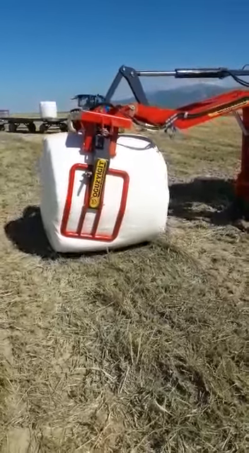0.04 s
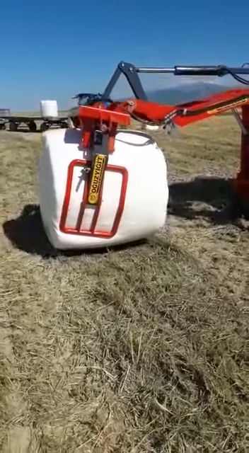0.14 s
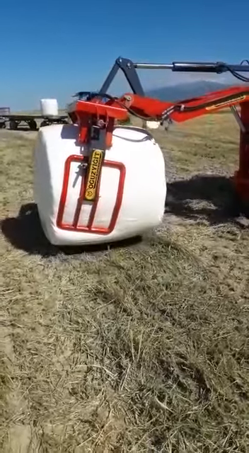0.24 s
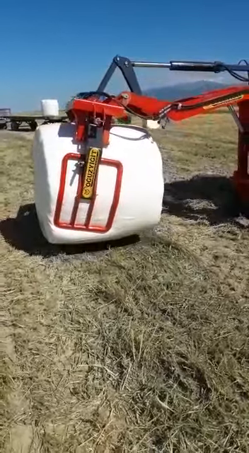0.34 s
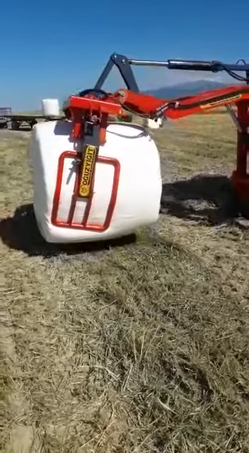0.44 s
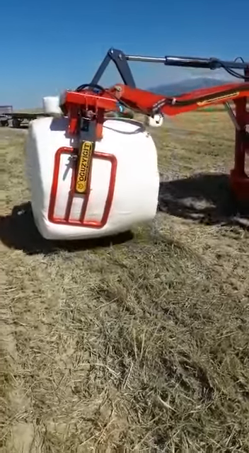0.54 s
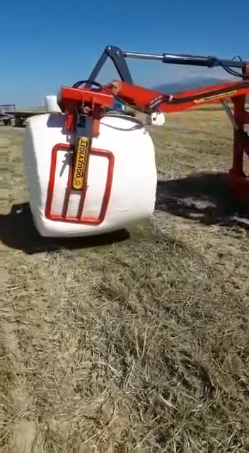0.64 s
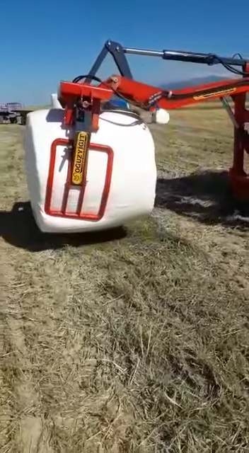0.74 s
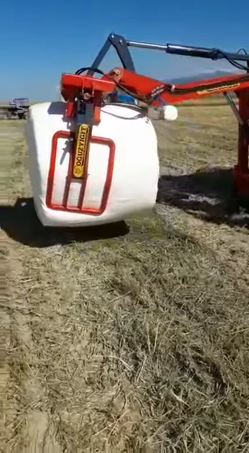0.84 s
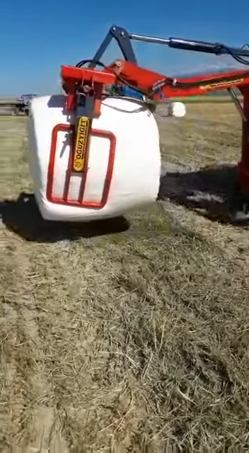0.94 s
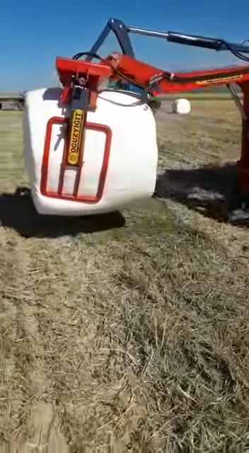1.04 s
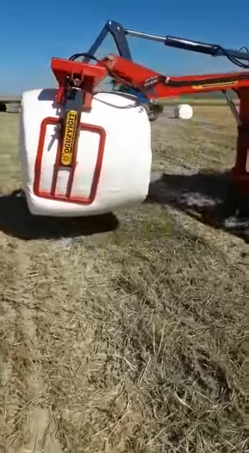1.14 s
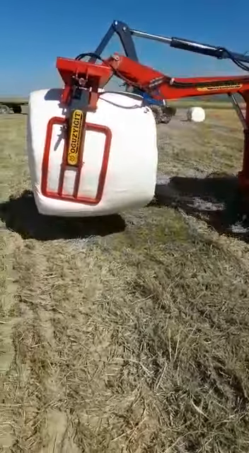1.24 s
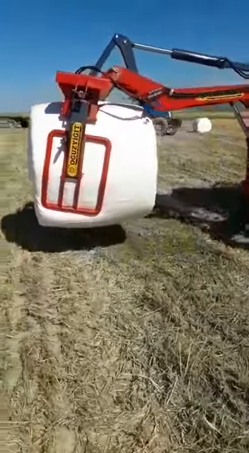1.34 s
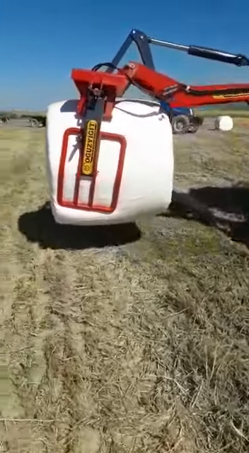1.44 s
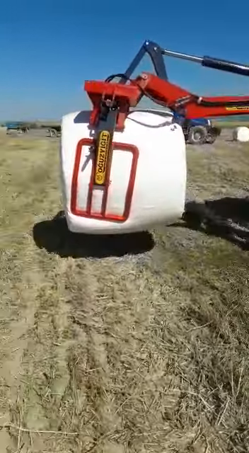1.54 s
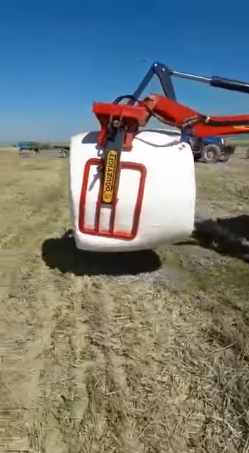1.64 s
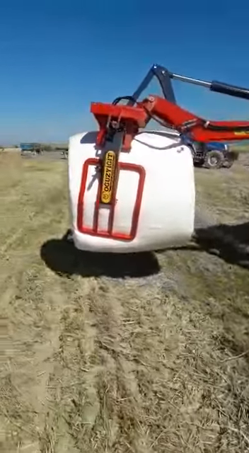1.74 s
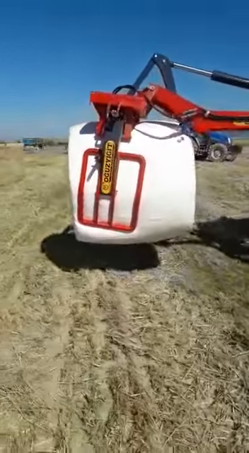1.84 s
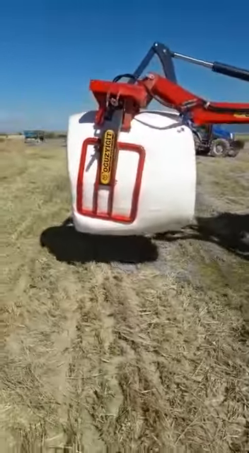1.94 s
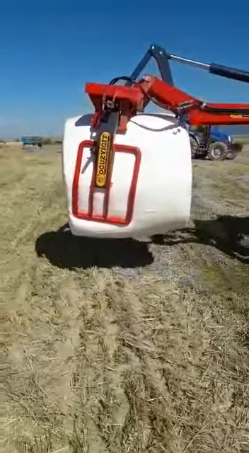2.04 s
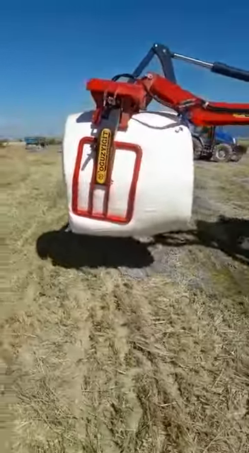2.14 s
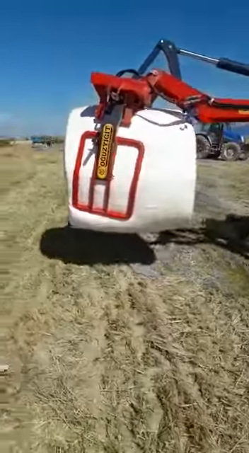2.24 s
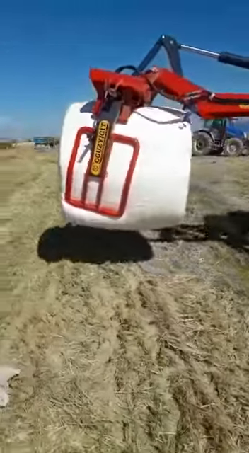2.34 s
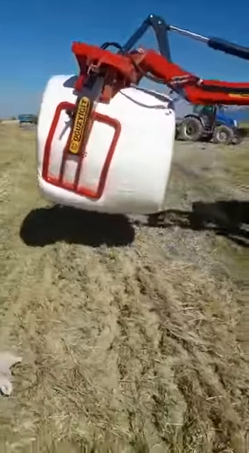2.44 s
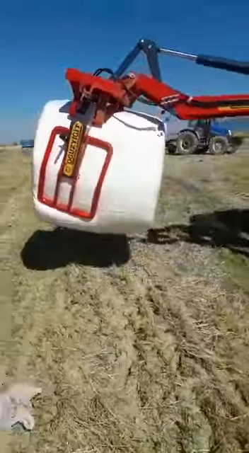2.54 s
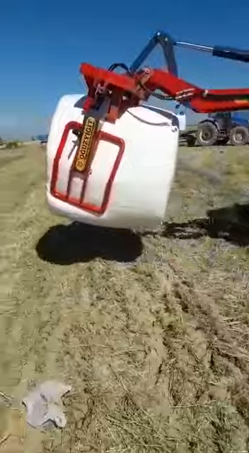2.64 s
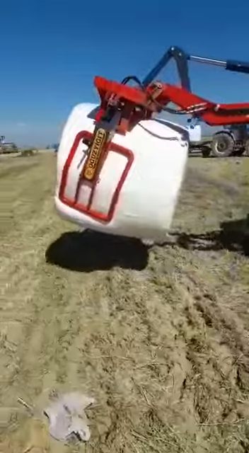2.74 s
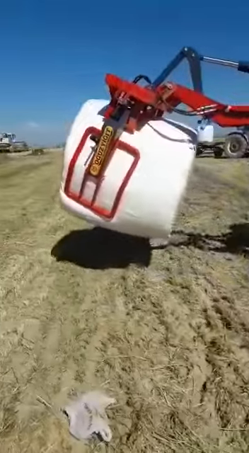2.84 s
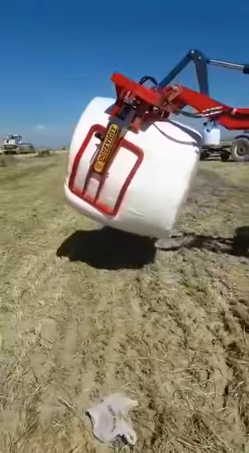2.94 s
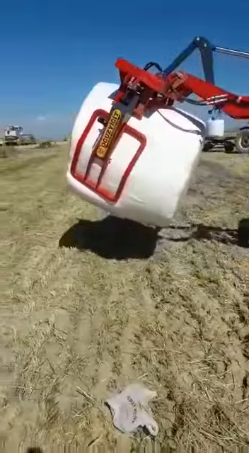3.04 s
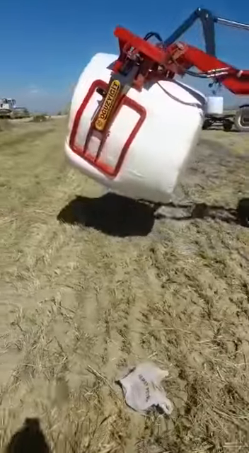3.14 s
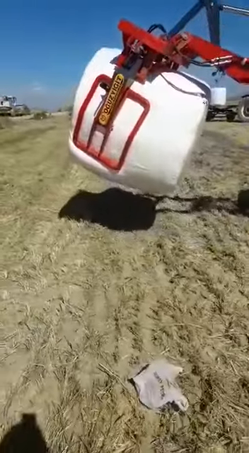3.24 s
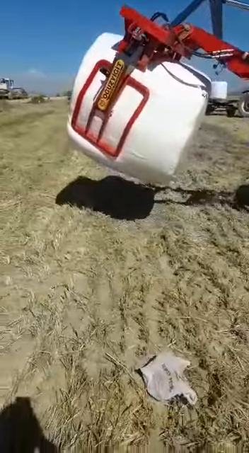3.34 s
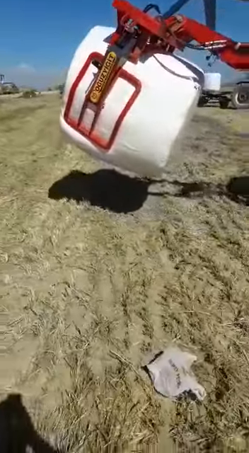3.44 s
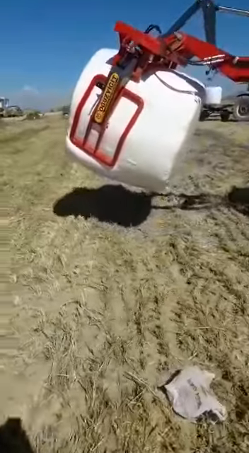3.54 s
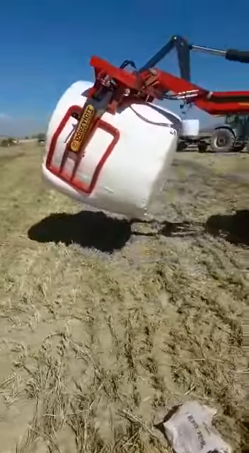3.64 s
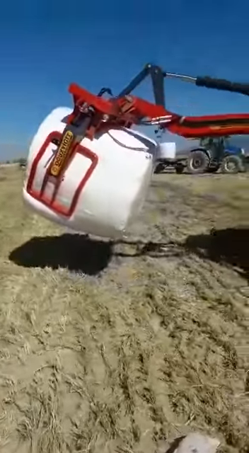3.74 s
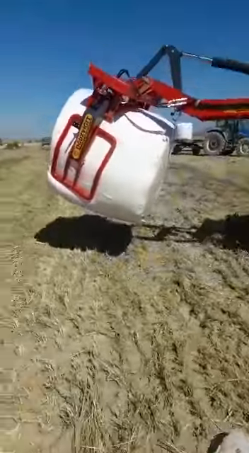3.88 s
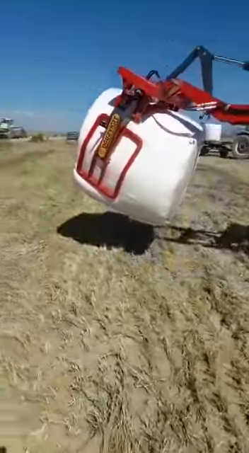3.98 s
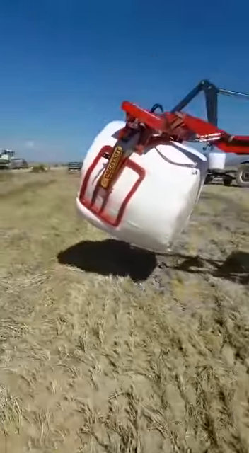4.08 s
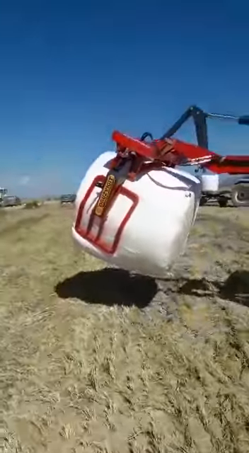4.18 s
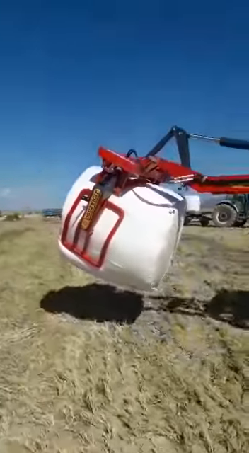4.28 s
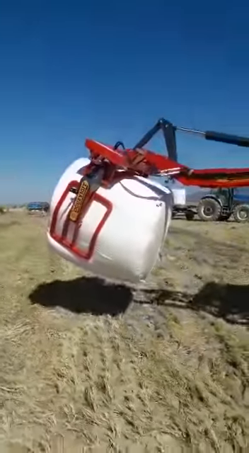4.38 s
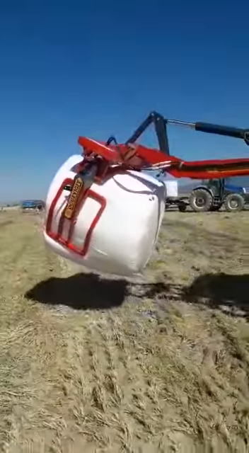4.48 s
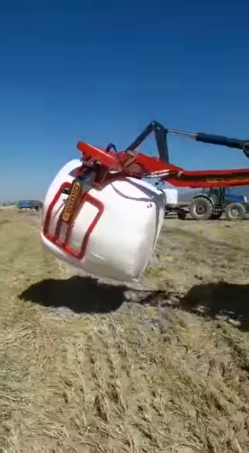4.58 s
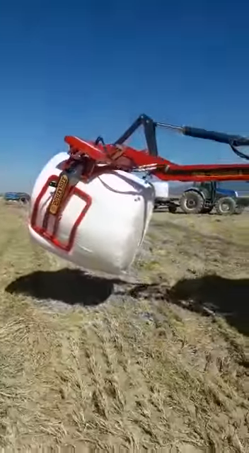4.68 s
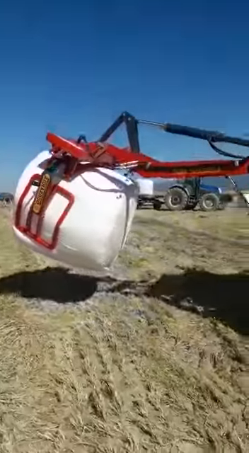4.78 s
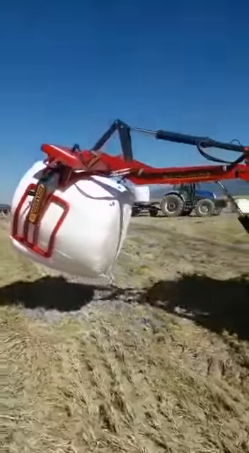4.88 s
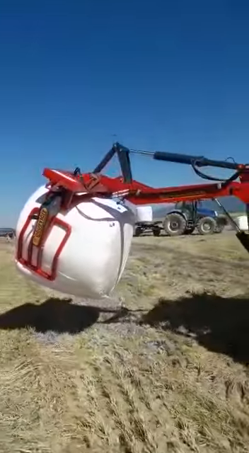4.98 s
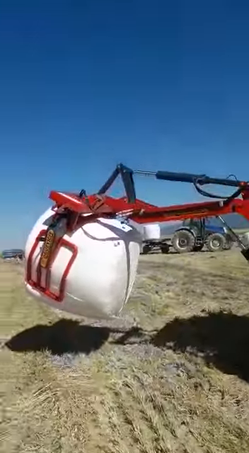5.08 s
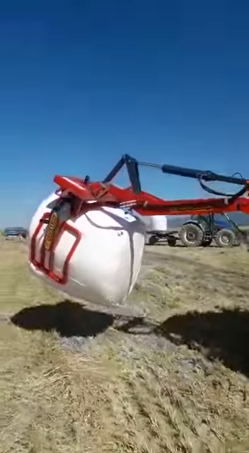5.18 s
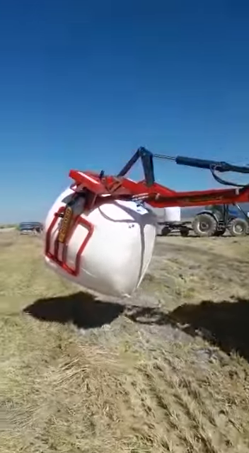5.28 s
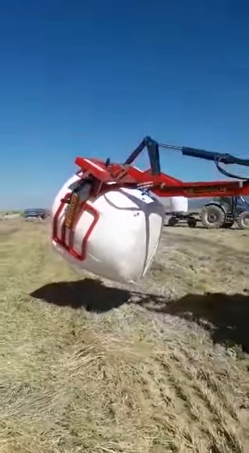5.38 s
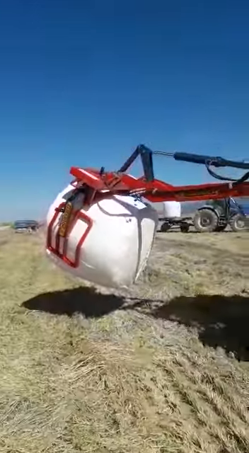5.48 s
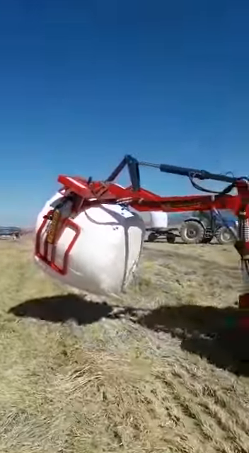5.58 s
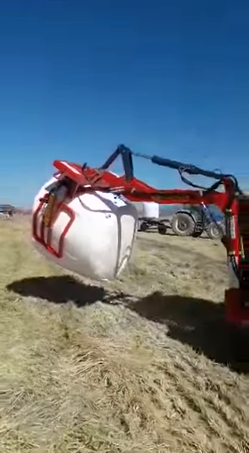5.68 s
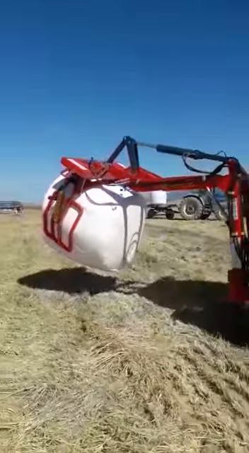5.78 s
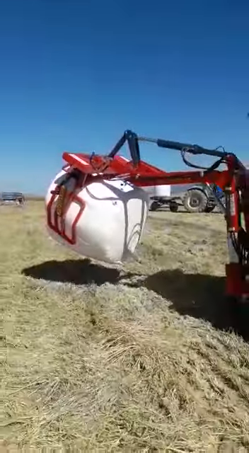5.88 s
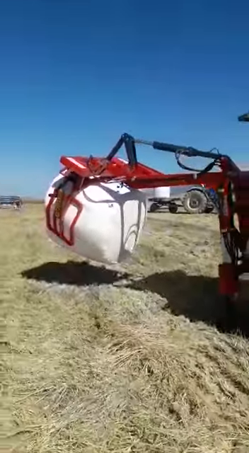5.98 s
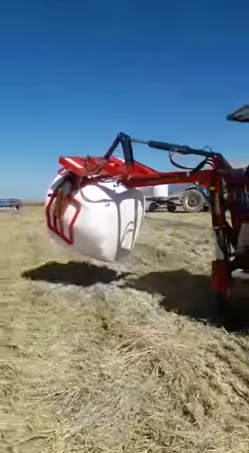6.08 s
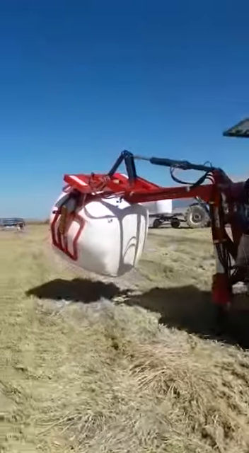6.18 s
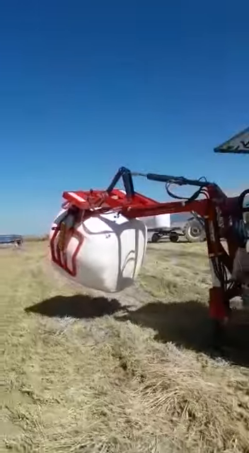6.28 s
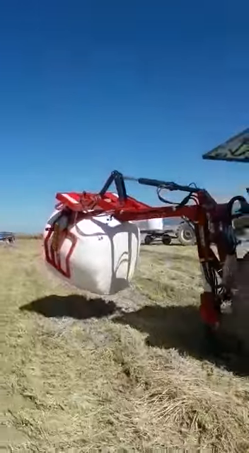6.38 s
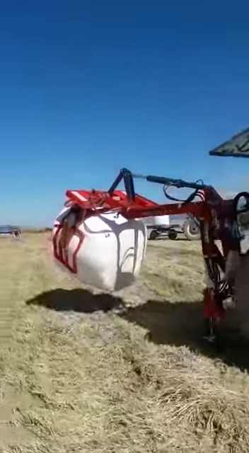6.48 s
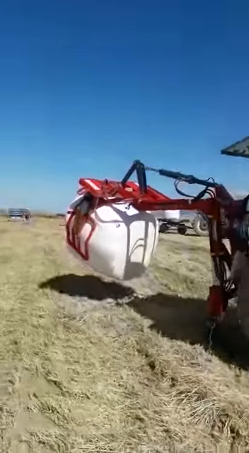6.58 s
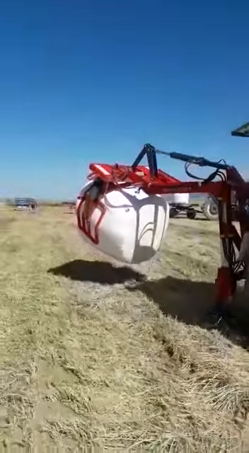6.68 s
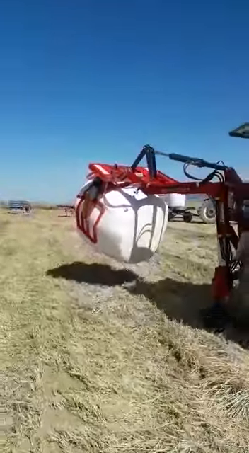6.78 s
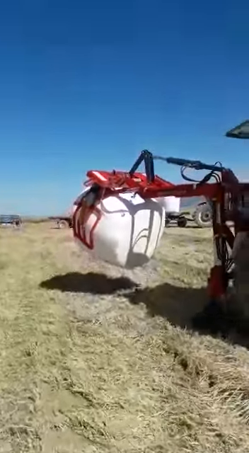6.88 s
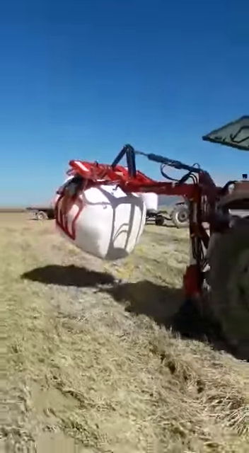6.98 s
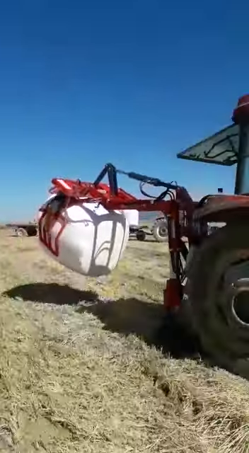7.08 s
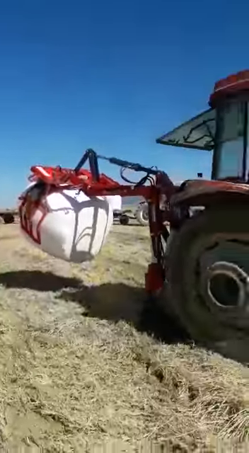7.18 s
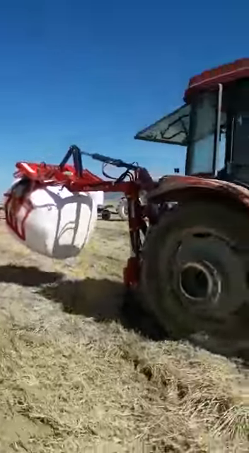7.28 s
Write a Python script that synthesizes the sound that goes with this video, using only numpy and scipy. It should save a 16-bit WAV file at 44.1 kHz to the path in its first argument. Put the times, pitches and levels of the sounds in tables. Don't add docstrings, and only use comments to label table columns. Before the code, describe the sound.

A tractor's muffled diesel idle turns into loud, rattling clatter with hydraulic squeals and metal knocks, then revs up as it passes close by.

```python
import sys
import numpy as np
from scipy import signal
from scipy.fft import rfft, irfft, next_fast_len
from scipy.io import wavfile
from scipy.ndimage import uniform_filter1d

SR = 44100
rng = np.random.default_rng(int(sys.argv[2]) if len(sys.argv) > 2 else 0)


def boost(x):
    u = np.asarray(x, float) / 20
    return 10 ** u


def to_wav(s):
    ch = np.atleast_2d(s).T
    pcm = np.round(np.clip(ch, -1, 1) * 32767)
    wavfile.write(sys.argv[1], SR, pcm.astype(np.int16))


N = 322812
IDLE_PER_S = 31
MID_DB = -35
ECHO_FADE_S = 0.091

# start_s, level_db
NEAR = [(0, -57), (.77, -54), (1.28, -52.5), (1.75, -54.5), (2.32, -49.5), (2.42, -37.5), (2.88, -32.5),
        (3.22, -37.5), (3.55, -34), (4.06, -37), (4.33, -32), (4.4, -43), (5.01, -37.5), (5.12, -30),
        (5.89, -28), (6.3, -21.5), (6.7, -22), (7.32, -23)]
# start_s, open_path (0-1)
IN_VIEW = [(0, 0), (2.3, 0.12), (2.42, 0.77), (4.35, 0.96), (4.4, 0.08), (5, 0.96), (5.1, 1), (7.32, 0.99)]
# idle_db, share of nearness, behind_bale_db, revs_db per firing/s, share of a lurch
RUMBLE_LAW = (-25, 0.63, 1, 0.0678, 0.6)
# pitch_hz, level_db (per Hz)
CLATTER = [(880, -26.5), (1500, -0.5), (1710, -12.5), (2140, -6), (2740, -10), (3010, -16.5), (4270, -26),
           (6130, -40), (7730, -54.5), (8500, -53), (11000, -81.5), (18700, -120)]
# pitch_hz, level_db (per Hz)
STUBBLE = [(4410, -43.5), (7500, -18), (8000, -25), (9510, -12.5), (11200, -3.5), (13800, -1), (15300, 1.5),
           (16200, -9.5)]


def rms_one(x):
    return x / np.sqrt(np.mean(x ** 2) + 1e-20)


def in_time(rows):
    start_s, *columns = np.transpose(rows)
    return [np.interp(np.arange(N) / SR, start_s, column) for column in columns]


def at_hz(points, hz):
    points_hz, points_db = np.transpose(points)
    return np.interp(np.log(hz), np.log(points_hz), points_db)


def drift(rate_hz):
    pole = np.exp(-80 * np.pi * rate_hz / SR)
    noise = rng.standard_normal(N // 40 + 2002)
    slow = signal.lfilter([1], [1, -2 * pole, pole * pole], noise)[2000:]
    return np.interp(np.arange(N) / 40, np.arange(len(slow)), rms_one(slow))


def coloured(x, colour):
    size = next_fast_len(N)
    hz = np.arange(1, size // 2 + 2) * SR / size
    inside = (hz > colour[0][0]) & (hz < colour[-1][0])
    return rms_one(irfft(rfft(x, size) * boost(at_hz(colour, hz)) * inside, size)[:N])


def tone(hz, wobble_hz, flutter_db, rough):
    turns = np.cumsum(hz + wobble_hz * drift(9.49)) / SR + rng.random()
    spread = 1 + rough * (drift(36.0) + 1j * drift(23.0))
    wave = np.real(spread * np.exp(2j * np.pi * turns))
    return np.sqrt(2) * wave * boost(flutter_db * drift(3.8))


def spell(start_s, length_s, fade_s):
    t = np.arange(N) / SR
    to_edge = np.minimum(t - start_s, start_s + length_s - t)
    return np.clip(to_edge / max(fade_s, 1e-3) + 0.5, 0, 1)


def spells_db(spells, fade_s):
    return sum(db * spell(start_s, length_s, fade_s) for start_s, length_s, db in spells)


def peak(at_s, length_s):
    return np.clip(1 - np.abs(np.arange(N) / SR - at_s) / max(length_s, 1e-3), 0, 1)


def heard_db(law, speed):
    # at_s, length_s, level_db
    lurches = [(1.765, 0.047, 6), (2.498, 0.033, 5.5), (2.531, 0.033, -2.5), (2.601, 0.049, 4),
               (2.691, 0.02, -2.5), (2.77, 0.11, 2), (3.496, 0.026, -4), (3.345, 0.14, 5.5),
               (4.316, 0.054, 2), (5.265, 0.062, 5), (5.736, 0.13, 2.5), (6.341, 0.031, 5),
               (6.443, 0.039, 1.5), (7.06, 0.048, 2.5), (7.132, 0.081, -2.5), (7.191, 0.08, 3.5)]
    idle_db, near_share, shaded_db, revs_db, lurch_share = law
    near_db = near_share * (in_time(NEAR)[0] - MID_DB)
    shade = 1 - np.clip(in_time(IN_VIEW)[0], 0, 1)
    lurch_db = sum(db * peak(at_s, length_s) for at_s, length_s, db in lurches)
    return idle_db + near_db + shaded_db * shade + revs_db * (speed - IDLE_PER_S) + lurch_share * lurch_db


def microphone_hiss():
    # pitch_hz, level_db (per Hz)
    hiss_colour = [(1180, -19.5), (2000, -0.5), (2510, -9.5), (3920, -12), (7690, -26), (10000, -24.5),
                   (13000, -48.5), (22000, -120)]
    return boost(-66.5) * coloured(rng.standard_normal(N), hiss_colour)


def breeze(speed):
    # pitch_hz, level_db (per Hz)
    wind_colour = [(20, -18.5), (30, -6), (40, -3.5), (55, -6.5), (80, -14)]
    # start_s, length_s, level_db
    gusts = [
        (2.5, 1.1, -9),
        (3.853, 0.8, 7),
        (4.998, 1.1, 1.5),
        (6.297, 0.56, -14),
    ]
    level_db = uniform_filter1d(heard_db(RUMBLE_LAW, speed), size=SR) * 0.56 - 47.5
    level_db += spells_db(gusts, 0.15)
    return boost(level_db + 3.5 * drift(2.3)) * coloured(rng.standard_normal(N), wind_colour)


def thuds():
    # at_s, level_db, pitch_hz, t60_s (time to die by 60 dB)
    case_knocks = [(1.777, -17.5, 114.6, 0.065), (2.277, -22.5, 122, 0.068), (2.353, -21.5, 100, 0.071),
                   (4.238, -23, 120, .03), (4.308, -12.5, 140, 0.046), (4.31, -15, 70, 0.073),
                   (4.356, -14, 175, 0.041), (4.4, -16, 101, 0.028), (4.48, -17, 111, 0.022),
                   (4.541, -13, 95, 0.022), (4.635, -17.5, 170, 0.064), (4.821, -15.5, 220, 0.024),
                   (4.905, -17.5, 230, 0.036), (5.044, -13, 140, 0.07), (2.545, -20, 377, 0.024),
                   (2.794, -19.5, 402, 0.029), (5.595, -15, 480, .02), (5.672, -17, 400, 0.021),
                   (5.736, -14, 420, 0.022), (5.788, -15, 400, .02)]
    out = np.zeros(N)
    t = np.arange(int(0.2 * SR)) / SR
    swell = (1 - np.exp(-t / 0.005)) ** 2
    for at_s, db, hz, t60_s in case_knocks:
        ring = swell * boost(-60 * t / max(t60_s, 0.02)) * np.sin(2 * np.pi * hz * t)
        at = round(at_s * SR)
        out[at:at + len(t)] += boost(db - 3.0) * ring / np.abs(ring).max()
    return out


def stubble(speed):
    # at_s, length_s, level_db
    steps = [(2.45, 0.12, -66), (2.57, .12, -67), (2.97, 0.18, -66), (3.117, 0.14, -64), (3.34, 0.15, -61),
             (3.444, 0.035, -66), (4.32, 0.041, -58), (5.264, .2, -67), (5.51, .25, -65.5),
             (5.693, 0.14, -63), (6.345, 0.32, -59), (6.685, 0.16, -56), (7.222, 0.16, -61)]
    # at_s, peak_db
    snaps = [(2.387, -60), (2.441, -63), (2.484, -60), (2.561, -60), (3.345, -58), (3.351, -58),
             (3.371, -58), (3.395, -59), (3.4355, -45), (3.4385, -48), (3.455, -55), (3.516, -59),
             (3.683, -59), (4.0946, -59), (4.3117, -55), (5.991, -49), (6.0697, -52), (6.1002, -51),
             (6.2984, -47), (6.57, -41), (6.7725, -47), (6.8339, -57.5), (6.9365, -45), (7.1166, -44),
             (7.1611, -47), (7.1814, -47), (7.2065, -41), (7.2647, -52)]
    # idle_db, share of nearness, behind_bale_db, revs_db per firing/s, share of a lurch
    tyres_law = (-72, 0.5, 1.5, 0.13, -1)
    sizes = boost(1.2 * np.minimum(rng.exponential(1, N), 5)) * rng.standard_normal(N)
    cracks_per_s = 16000 * boost(1.3 * drift(40.0))
    cracks = sizes * (rng.random(N) < cracks_per_s / SR)
    field = boost(2 * -70.5)
    tyres = boost(2 * heard_db(tyres_law, speed))
    feet = sum(boost(2 * db) * peak(at_s, length_s) ** 2 for at_s, length_s, db in steps)
    out = boost(-1.5) * np.sqrt(field + tyres + feet) * coloured(cracks, STUBBLE)
    fade = np.exp(-np.arange(260) / 60.0)
    bright = signal.butter(4, [11500, 16000], "band", fs=SR, output="sos")
    for at_s, db in snaps:
        snap = signal.sosfilt(bright, rng.standard_normal(260) * fade)
        at = round(at_s * SR)
        out[at:at + 260] += boost(db) * snap / np.abs(snap).max()
    return out


def slams():
    # at_s, level_db, rise_s, t60_s
    joints = [
        (1.755, -43.5, 0.009, 0.083),
        (2.481, -47, 0.0061, 0.062),
        (2.578, -39, 0.0031, 0.027),
        (2.678, -34, 0.00096, .015),
        (4.305, -30, 0.021, 0.12),
        (5.595, -33, 0.0022, 0.045),
        (.659, -52, .002, .03),
        (2.701, -37, 0.0022, .03),
        (4.27, -30, 0.043, .1),
    ]
    # pitch_hz, level_db (per Hz)
    slam_colour = [(100, -20), (200, 0), (400, 0), (700, -8), (1100, -10), (1650, -17), (4370, -32),
                   (8000, -56), (10400, -95), (17600, -120)]
    t, shape = np.arange(N) / SR, np.zeros(N)
    for at_s, db, rise_s, t60_s in joints:
        since = np.maximum(t - at_s, 0)
        dying_db = -60 * np.maximum(since - rise_s, 0) / t60_s
        shape += boost(db + dying_db) * np.minimum(since / rise_s, 1) ** 2
    return shape * coloured(rng.standard_normal(N), slam_colour)


def gear_whine(speed):
    teeth_per_firing = [27.2, 27.6, 33, 54.7, 18.2, 7.2, 22.5, 8, 11, 5, 8.7]
    # (start_s, length_s, level_db over nearness)
    gears = [(1.5, 0.22, [(4.78, 0.17, -10), (5.06, 0.14, -3.5), (5.2, .12, -9), (5.33, .27, -17),
             (5.63, .11, -7), (5.74, 0.19, -3.5), (5.96, .3, -19), (6.32, .13, -2), (6.45, 0.22, -7.5),
             (6.67, 0.17, -2), (6.84, .1, -6), (6.94, 0.09, -2.5), (7.03, .08, -7), (7.18, 0.2, -4)]),
             (14.03, 2.47, [(5.3, 0.24, -23), (5.97, .2, -21), (7.15, 0.1, -17)]),
             (1.5, 0.3, [(1.3, .5, -12), (2.2, .12, -8), (3.02, .12, -13), (3.14, 0.32, -5),
             (3.46, .3, -13), (4.5, 0.51, -16.5), (6.6, 0.88, -22)]), (6.9, 1.4, [(5.2, 2.2, -34.5)]),
             (3.0, 0.17, [(4.9, 0.6, -15), (6.4, 0.8, -15)]), (0.83, 0.12, [(1.15, 0.46, 3), (1.8, 0.32, 6),
             (2.55, .1, 2.5), (3.6, 0.12, -1), (3.9, 0.67, -2), (5.05, 0.31, 0), (5.36, .22, -2),
             (5.6, 0.5, -7), (6.1, .25, -5), (6.95, 0.33, -3.5)]), (2.7, 0.12, [(5.3, 3, -27.5)]),
             (1.5, 0.7, [(.25, .6, 6.5)]), (0.68, 0.18, [(1.45, 0.47, 2.5), (3.0, 0.66, -0.5),
             (3.8, 0.54, -2.5)]), (1.95, 0.84, [(4.75, 0.58, -4.5), (5.4, 0.37, -11.5), (6.85, 0.56, -10)]),
             (1.5, .4, [(6.4, .45, -7)])]
    out = np.zeros(N)
    for teeth, (wobble_hz, rough, spells) in zip(teeth_per_firing, gears):
        load = sum(boost(db) * spell(start_s, length_s, 0.07) for start_s, length_s, db in spells)
        out += load * tone(teeth * speed, wobble_hz, 0.86, rough)
    return boost(in_time(NEAR)[0]) * out


def valve_squeal():
    # start_s, length_s, first_hz, last_hz, level_db
    squeals = [(0.7, .07, 1260, 1320, -60), (0.83, 0.06, 1255, 1295, -60), (.92, 0.067, 1330, 1385, -57),
               (0.99, 0.095, 1265, 1385, -53), (1.175, 0.08, 1245, 1255, -52),
               (1.255, .08, 1255, 1275, -48.5), (1.335, .09, 1275, 1285, -50),
               (1.425, .11, 1300, 1375, -52), (1.54, 0.1, 1355, 1400, -56), (2.3, .09, 1270, 1320, -48),
               (2.394, 0.26, 1315, 1332, -46.5), (2.785, 0.13, 1420, 1433, -43),
               (3.158, .13, 1405, 1445, -41), (3.29, .06, 1445, 1420, -36), (3.35, .09, 1400, 1385, -39),
               (3.44, 0.13, 1340, 1320, -40.5), (3.803, 0.2, 1390, 1450, -46.5),
               (4.09, .16, 1450, 1440, -47)]
    glide, flow = [], 0
    for start_s, length_s, first_hz, last_hz, db in squeals:
        glide += [(start_s, first_hz), (start_s + length_s, last_hz)]
        flow = flow + boost(db) * spell(start_s, length_s, 0.036) ** 2
    turns = 2 * np.pi * np.cumsum(in_time(glide)[0]) / SR
    slow = signal.butter(2, 30.0, fs=SR, output="sos")
    sway = rms_one(signal.sosfilt(slow, rng.standard_normal((2, N))))
    return flow * ((0.83 + 0.25 * sway[0]) * np.cos(turns) + 0.53 * sway[1] * np.sin(turns))


def clacks():
    # at_s, peak_db
    hard_knocks = [(2.4786, -37), (2.5499, -36), (2.6711, -34), (2.7035, -40), (2.734, -42), (2.7599, -37),
                   (2.7889, -38), (2.567, -35), (2.82, -34), (2.915, -35), (2.975, -36), (2.9126, -37),
                   (3.2662, -41), (3.3287, -28), (3.4992, -35), (3.563, -37), (3.8589, -40), (3.9097, -33),
                   (3.944, -41), (4.0395, -31), (4.1286, -36), (4.2505, -38), (4.3159, -27), (4.7509, -38),
                   (4.9375, -40), (5.0447, -37), (5.601, -26), (5.8514, -39), (6.0529, -29), (6.2063, -28),
                   (6.475, -20), (6.7144, -15), (6.8546, -31.5), (6.8945, -26.5), (6.9349, -32),
                   (7.0177, -24), (7.1195, -25), (7.2652, -17)]
    shape = np.zeros(N)
    for at_s, db in hard_knocks:
        at = round(at_s * SR)
        t = np.arange(min(4000, N - at)) / SR
        rise = np.tanh(t / 0.0015)
        shape[at:at + 4000] += boost(db - 12.5 - 60 * t / 0.035) * rise
    return shape * coloured(rng.standard_normal(N), CLATTER)


def firing_noise(firings, colour, punch, decay, uneven_db):
    chance = np.clip(rng.standard_normal(400), -2, 1.3)
    strength = boost(uneven_db * chance)[firings.astype(int)]
    cycle = firings % 1
    burst = punch * strength * np.exp(-decay * cycle) * np.tanh(14.0 * cycle)
    return coloured(rng.standard_normal(N) * (1 + burst) * boost(0.21 * drift(2.0)), colour)


def firing_knocks(firings, uneven_db):
    # pitch_hz, level_db (per Hz)
    knock_colour = [(60, -27.5), (130, -7), (250, 2), (420, 0.5), (700, -12), (1300, -27.5), (2500, -43),
                    (4000, -68.5)]
    at = np.flatnonzero(np.diff(firings.astype(int)))
    late = (0.0012 * SR * rng.standard_normal(len(at))).astype(int)
    strength = boost(uneven_db * np.clip(rng.standard_normal(len(at)), -2, 1.5))
    spikes = np.zeros(N)
    spikes[np.clip(at + late, 0, N - 1)] = -strength
    return coloured(spikes, knock_colour)


def exhaust_note(speed):
    # pitch_hz, level_db
    pipe = [(28, -7.5), (50, -11.5), (65, -2), (95, 2), (125, 1.5), (155, 0), (200, -5), (300, -7),
            (400, -10.5), (620, -16)]
    # start_s, length_s, level_db
    echo = [
        [(2.1, 0.24, 6), (2.7, 0.79, -9), (4.5, 0.72, 7), (6.33, 0.44, -19)],
        [(0, 1.7, -3), (2.2, 0.28, 7), (5.75, 0.3, -4), (6.4, 0.24, -8.5), (6.9, 0.48, -3.5)],
        [(2.45, 1, -15), (3.7, 0.51, -3), (5.1, 0.2, 6.5), (5.45, 0.24, -14), (5.75, 0.27, 6.5), (6.05, .25, 3),
         (6.3, 0.19, 4), (6.62, 0.11, 3.5), (6.8, 0.15, -11)],
        [(2.45, 1, 2), (6.0, 0.33, 3.5), (6.75, 0.5, -0.5)],
        [(5.08, 0.3, 8), (5.45, 0.13, 7.5), (5.7, 0.28, 2.5), (0.86, 0.59, 2), (2.4, 0.11, 5), (3.6, 0.99, 5)],
        [(4.55, 0.48, 10), (6.3, 0.3, 6.5), (6.75, 0.72, 6)],
    ]
    # idle_db, share of nearness, behind_bale_db, revs_db per firing/s, share of a lurch
    note_law = (-43, 0.5367, 5, 0.4182, 0)
    echo_db = [spells_db(spells, ECHO_FADE_S) for spells in echo] + [0] * 6
    note = np.zeros(N)
    for k in range(1, 13):
        note += boost(at_hz(pipe, k * speed) + echo_db[k - 1]) * tone(k * speed, 0.24, 1.1, 0.22)
    return boost(heard_db(note_law, speed)) * note


def engine(speed):
    # pitch_hz, level_db (per Hz)
    rumble_colour = [(15, -52), (25, -23), (52, -16.5), (91, -3), (124, -0.5), (225, 2), (279, -4),
                     (342, 1), (403, -4), (520, -11), (680, -34), (1140, -120)]
    block_colour = [(260, -33), (450, 2.5), (551, 1.5), (604, -1), (805, 0), (913, -5.5), (1010, -3.5),
                    (1380, -3), (1620, -13), (1950, -15), (2400, -28), (3120, -55), (5280, -120)]
    shaded_colour = [(260, -37), (450, -9.5), (575, 3.5), (608, -3.5), (690, 1.5), (863, -2.5), (1170, -1),
                     (1280, -0.5), (1670, -10.5), (2400, -49.5), (3120, -66.5), (5280, -120)]
    # idle_db, share of nearness, behind_bale_db, revs_db per firing/s, share of a lurch
    clatter_law = (-50.5, 1.39, 0.5, -0.0422, 0.82)
    # start_s, length_s, level_db
    lugging = [
        (0, 0.13, 1.5),
        (1.85, 0.45, -5),
        (2.36, 0.17, 3),
        (2.763, 0.26, -1.5),
        (4.4, 0.31, 1),
        (5.557, 0.37, -1.5),
        (6.25, 0.087, 2),
    ]
    # start_s, length_s, level_db (of clatter)
    grille = [
        (1.4, 0.68, -8),
        (2.329, 0.24, 1.5),
        (2.704, 0.77, 1.5),
        (3.85, 0.57, -1.5),
        (4.382, 0.14, 2.5),
        (5.617, 0.36, -2),
    ]
    # at_s,
    # lead (firings)
    firing_lead = [(0, 1.2), (.6, 1.15), (1.1, 1.25), (1.5, 1.45), (2.3, 1.53), (2.5, 1.33), (3, 1.44),
                   (3.5, 1.38), (4.4, 1.27), (4.9, .73), (5.4, .76), (5.9, 1.13), (6.3, 1.43), (7.32, 1.43)]
    rumble_db = heard_db(RUMBLE_LAW, speed) + spells_db(lugging, ECHO_FADE_S)
    clatter_db = heard_db(clatter_law, speed) + spells_db(grille, ECHO_FADE_S)
    block_db = heard_db((MID_DB, 1, 0, 0, 1), speed)
    firings = np.cumsum(speed) / SR + in_time(firing_lead)[0]
    distinct = (IDLE_PER_S / speed) ** 1.03
    seen = np.clip(in_time(IN_VIEW)[0], 0, 1)

    rumble = boost(rumble_db - 5.5) * firing_noise(firings, rumble_colour, 1.9 * distinct, 2.7, 2.5)
    knocks = firing_knocks(firings - 0.1, 2.8)
    rumble += boost(rumble_db - 11.5) * (0.16 + 0.77 * seen) * knocks
    block = np.sqrt(seen) * firing_noise(firings, block_colour, 0.94 * distinct, 1.9, 1.9)
    block += np.sqrt(1 - seen) * firing_noise(firings, shaded_colour, 0.89, 1.9, 2.7)
    clatter = boost(clatter_db + 1.8) * firing_noise(firings, CLATTER, 1.0, 2.3, 4.1)
    shaken_stubble = boost(clatter_db - 29) * firing_noise(firings, STUBBLE, 1.6, 4.0, 2.5)
    return exhaust_note(speed) + rumble + boost(block_db - 0.44) * block + clatter + shaken_stubble


def scene():
    # at_s, speed (firings per second)
    speed_points = [(0, 28.5), (.4, 28.5), (1.5, 30.4), (2.25, 31.0), (2.45, 29.8), (2.75, 32.7),
                    (3.1, 30.5), (3.3, 31.6), (3.52, 30.5), (4.05, 32.9), (4.36, 33.2), (4.8, 43.6),
                    (5.1, 48.6), (5.5, 51.4), (5.86, 50.0), (6.25, 51.6), (6.7, 49.7), (7.08, 48.75),
                    (7.32, 48.55)]
    speed = in_time(speed_points)[0]
    surroundings = microphone_hiss() + breeze(speed) + thuds() + stubble(speed)
    loader = slams() + gear_whine(speed) + valve_squeal()
    return (surroundings + loader + clacks() + engine(speed))[None]


def band_limit(x):
    return signal.sosfilt(signal.butter(12, 16320, fs=SR, output="sos"), x)


def record(dry):
    rounded = 0.82 * np.tanh(dry / 0.98)
    no_bass = signal.sosfilt(signal.butter(2, 40.0, "high", fs=SR, output="sos"), rounded)
    no_top = signal.sosfilt(signal.ellip(12, 0.5, 60, 15785, fs=SR, output="sos"), no_bass)
    mix = no_top * signal.windows.tukey(N, 200 / N)
    return band_limit(mix)


dry = scene()
out = record(dry)
to_wav(out)
```